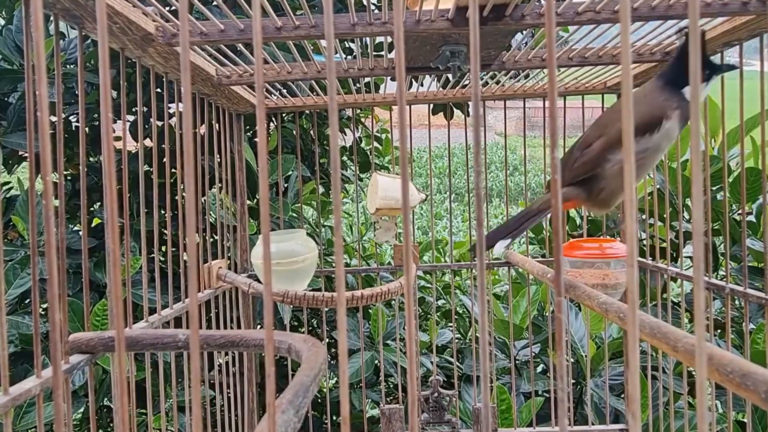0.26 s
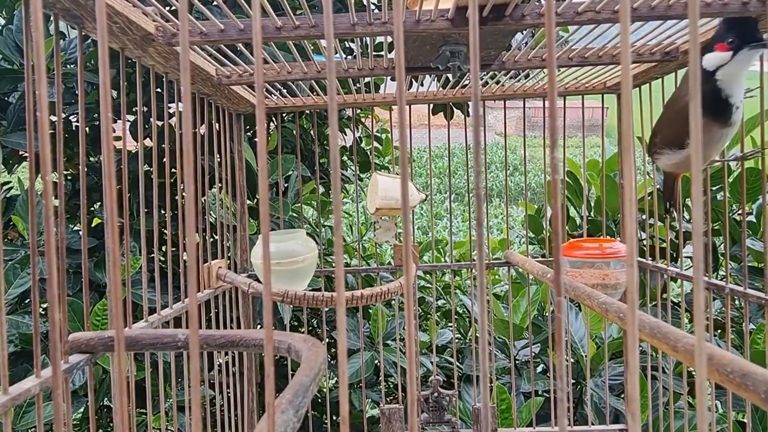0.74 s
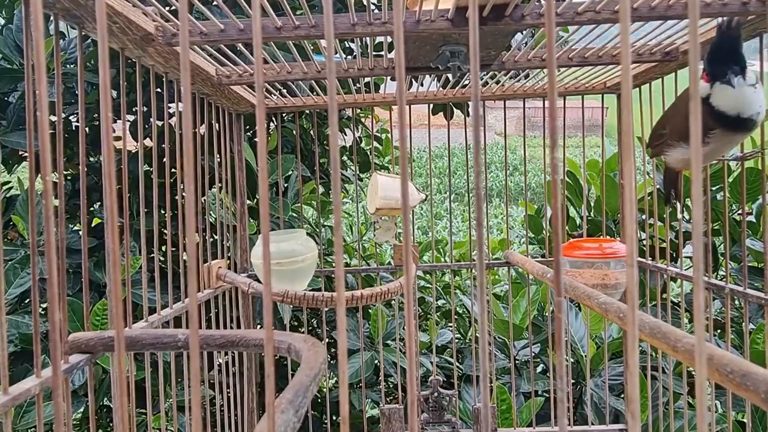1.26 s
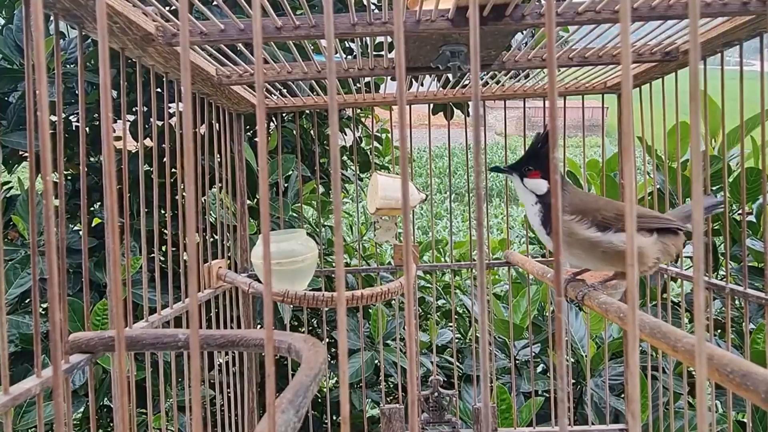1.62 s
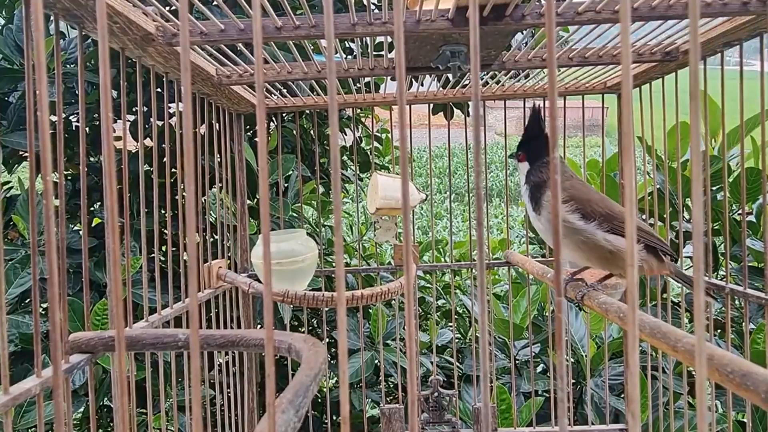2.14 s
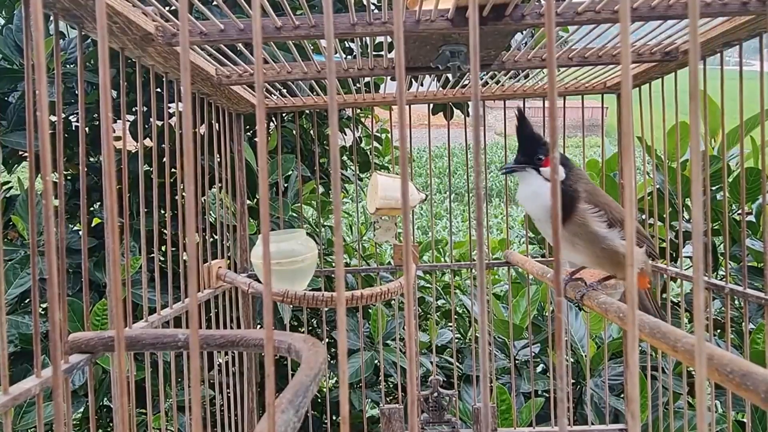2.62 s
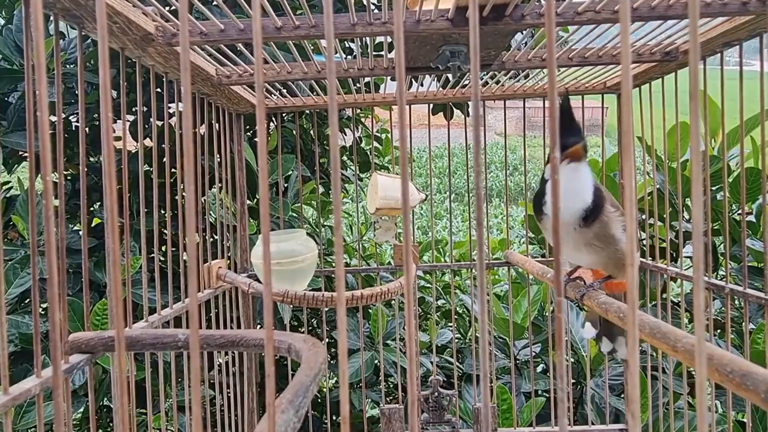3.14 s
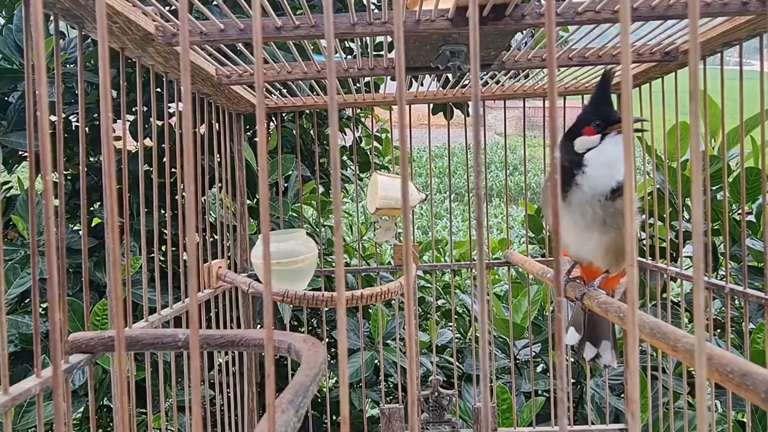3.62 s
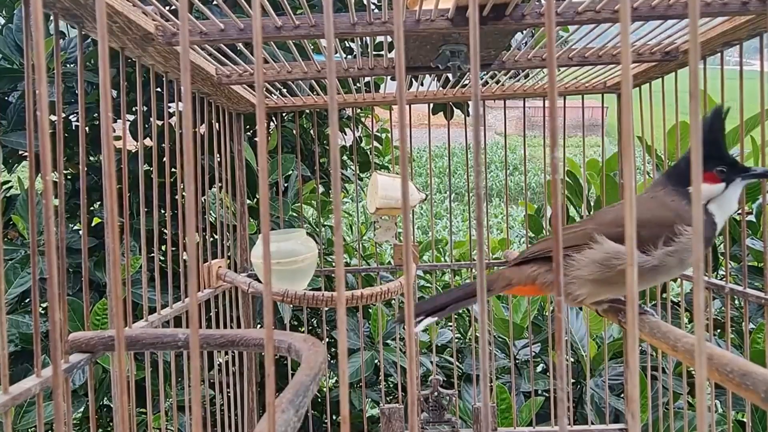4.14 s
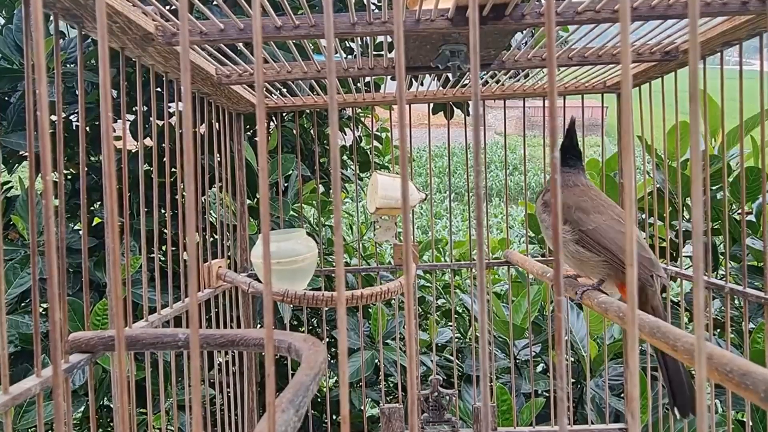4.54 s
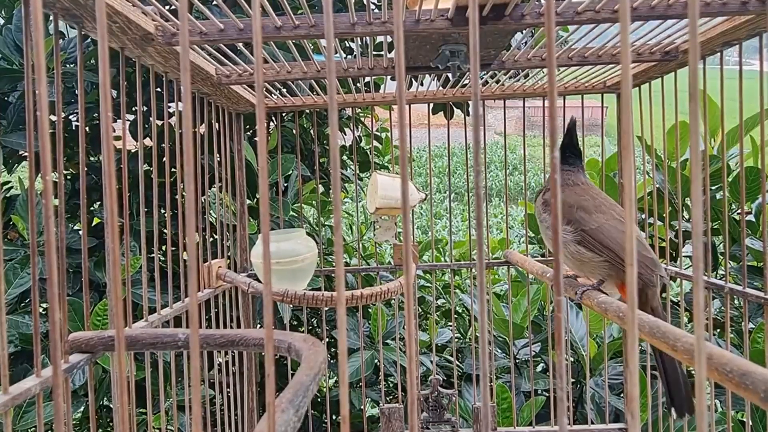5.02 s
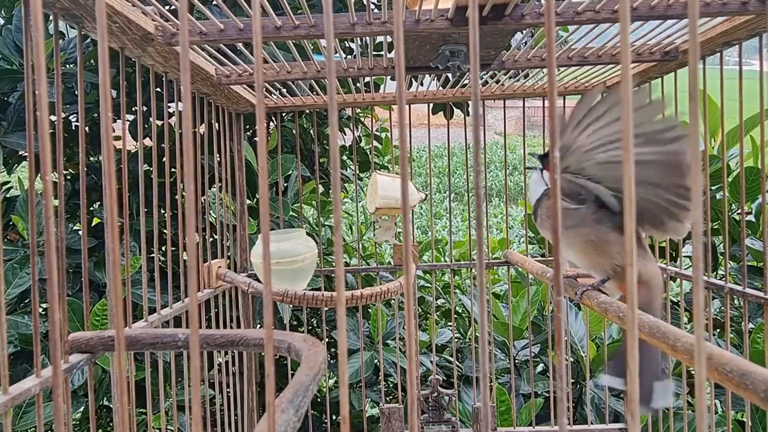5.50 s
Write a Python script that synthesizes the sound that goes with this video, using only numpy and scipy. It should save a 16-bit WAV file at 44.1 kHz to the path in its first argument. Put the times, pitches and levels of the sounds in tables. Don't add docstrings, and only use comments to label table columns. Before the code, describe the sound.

An outdoor yard, very quiet: low traffic rumble, thin leaf hiss and blurred far birds giving falling whistles from 0.3 to 1.2 s, then answering calls and dim coos until about 2.7 s. Small dry scratches of claws and wings on thin cage bars come near 0.45, 0.75 and 1.6 s. At 2.7 s the close bird suddenly whistles, far louder than everything else: a bouncing low-to-mid note, a harsh warble at 3.05, then from 3.2 to 3.9 a rapid run of rising, sweeping and rippling notes, ending on a soft flat low tone. Each is fluttery, slightly hoarse and airy, with a short cage echo. A faint rustle follows at 4.0, a distant metal knock at 4.45, then soft wing flutter and low wind puffs. A loud high warble sounds at 5.2, a climbing one at 5.55, and a brief soft chirp at 5.7.

```python
import sys
import numpy as np
from scipy import signal
from scipy.io import wavfile
from scipy.ndimage import uniform_filter1d, minimum_filter1d

SR = 44100
rng = np.random.default_rng(int(sys.argv[2]) if len(sys.argv) > 2 else 0)


def generate_wav(sig):
    pcm = np.round(np.clip(np.atleast_2d(sig).T, -1, 1) * 32767).astype(np.int16)
    wavfile.write(sys.argv[1], SR, pcm)


def voltage_ratio(decibels):
    exponent = np.asarray(decibels, float) / 20
    return 10 ** exponent


N = 254456


def rms_one(x):
    return x / np.sqrt(np.mean(x ** 2) + 1e-20)


def at_hz(points, hz):
    points = np.array(points)
    return np.interp(np.log(hz), np.log(points[:, 0]), points[:, 1])


def add(out, sound, start_s):
    i = round(start_s * SR)
    out[:, i:i + sound.shape[-1]] += sound[..., :N - i]


def drift(rate_hz, size):
    u = np.arange(size) * rate_hz * 2 / SR
    eased = u - np.sin(2 * np.pi * u) / (2 * np.pi)
    return np.interp(eased, np.arange(size), rng.standard_normal(size))


def band(x, low_hz, high_hz):
    return signal.sosfilt(signal.butter(2, [low_hz, high_hz], "band", fs=SR, output="sos"), x)


def coloured(points, alike, lead, patchy_db):
    out = 0
    white = rng.standard_normal((2, 2, N))
    for k, low_hz in enumerate(20 * 2 ** np.arange(0, 10, .5)):
        hz = low_hz * 2 ** .25
        mid, side = band(white[k % 2], low_hz, low_hz * 2 ** .5)
        c = np.clip(at_hz(alike, hz), 0, 1)
        left, right = np.sqrt(1 + c) * mid + np.sqrt(1 - c) * side * [[1], [-1]]
        lag = round(at_hz(lead, hz) / (2 * np.pi * hz) * SR)
        level = voltage_ratio(at_hz(points, hz) + patchy_db * drift(4, N))
        out = out + level * np.array([left, np.roll(right, lag)])
    return rms_one(out)


def echoes(x, t60_s, alike):
    t = np.arange(int(.9 * SR)) / SR
    mid, side = rng.standard_normal((2, len(t))) * voltage_ratio(-60 * t / t60_s) * (t > .001)
    answer = alike * mid + (1 - alike) * side * [[1], [-1]]
    answer /= np.sqrt(np.mean(np.sum(answer ** 2, axis=1)))
    return signal.fftconvolve(x, answer, axes=1)[:, :N]


# freq_hz, level_db
PARTIALS = [(5000, -52.5), (7500, -50), (9500, -41), (12500, -37), (15000, -41)]
ATTACK_S, RELEASE_S, EDGE_DB = .007, .0079, -35
MID_HZ, LEFT_DB_PER_KHZ, BRIGHT_DB_PER_KHZ = 2600, -3, 4
HALF_PITCH_DB, HALF_DB_PER_KHZ = -51, 7
JITTER_HZ, HOARSE = 25, .15
OVERTONE_FUZZ, OVERTONE_BLUR_RAD = .97, .8
BEAK_WIDTH_HZ, BEAK_LOSS_DB = 1500, -1.5


def note(rows, warble, turns, left_db, lead_us, bright_db, second_db, beak_hz, lift_db):
    first_hz, last_hz, swing_hz, depth = warble
    start_turns, ahead_turns = turns
    s, hz, level_db, effort = np.transpose(rows)
    t = np.arange(s[0] - ATTACK_S, s[-1] + RELEASE_S, 1 / SR)
    size = len(t)
    hz, level_db, effort = [np.interp(t, s, c) for c in (hz, level_db, np.clip(effort, 0, 1))]
    hz = uniform_filter1d(hz, size=90)
    high_khz = (hz - MID_HZ) / 1000
    bright_db = bright_db + BRIGHT_DB_PER_KHZ * high_khz
    second_db = second_db + 2 * BRIGHT_DB_PER_KHZ * high_khz

    rate_hz = np.linspace(first_hz, last_hz, size) * (1 + .03 * drift(60, size))
    shake = 2 * np.pi * (start_turns + np.cumsum(rate_hz) / SR)
    hz = hz + swing_hz * effort * np.sin(shake + 2 * np.pi * ahead_turns)
    hz = hz + (6 + JITTER_HZ * effort) * drift(300, size)
    throb = np.clip(depth, 0, 1) * effort
    throbbing = 1 - throb + throb * np.cos(shake) + HOARSE * throb * drift(220, size)
    throbbing /= np.sqrt((1 - throb) ** 2 + throb ** 2 / 2)

    edge = np.maximum(0, np.maximum((s[0] - t) / ATTACK_S, (t - s[-1]) / RELEASE_S))
    level = voltage_ratio(uniform_filter1d(level_db + EDGE_DB * edge, size=130))
    level = level * np.clip(np.minimum(t - t[0], t[-1] - t) / .002, 0, 1)

    ear_lead_s = lead_us * 1e-6 * np.array([[.5], [-.5]])
    phase = 2 * np.pi * (np.cumsum(hz) / SR + hz * ear_lead_s)
    tone = np.sin(phase)
    tone += voltage_ratio(second_db) * np.sin(2 * phase + OVERTONE_BLUR_RAD * effort * drift(250, size))
    tone += voltage_ratio(HALF_PITCH_DB + HALF_DB_PER_KHZ * high_khz) * np.sin(phase / 2)
    tone *= level * throbbing

    for k in range(3, 9):
        flicker = .8 * drift(400, size) + .6 * drift(350, size) * [[1], [-1]]
        fuzz = 1 + OVERTONE_FUZZ * (.5 + .5 * effort) * flicker
        beak_db = BEAK_LOSS_DB + lift_db * np.exp(-((k * hz - beak_hz) / BEAK_WIDTH_HZ) ** 2)
        gain = voltage_ratio(at_hz(PARTIALS, k * hz) + bright_db + beak_db) * (k * hz < .4 * SR)
        blur = OVERTONE_BLUR_RAD * (.12 + 1.3 * effort) * drift(900, size)
        tone += level ** .6 * gain * fuzz * np.sin(k * phase + blur)

    left_db = left_db + LEFT_DB_PER_KHZ * high_khz
    return tone * voltage_ratio(np.array([left_db / 2, -left_db / 2])), level ** .7 * voltage_ratio(bright_db)


CRACK_HALF_S, CRACK_EDGE_DB = .007, -10


def crack(mid_s, first_hz, last_hz, level_db):
    soft_db = level_db + CRACK_EDGE_DB
    return [(mid_s - CRACK_HALF_S, first_hz, soft_db, 1),
            (mid_s, (first_hz + last_hz) / 2, level_db, 1),
            (mid_s + CRACK_HALF_S, last_hz, soft_db, 1)]


# time_s, pitch_hz, level_db, effort_0to1
OPENING_NOTES = [
    [(2.735, 1553, -17.5, .03), (2.757, 1951, -7, 0), (2.768, 2300, -8, .07), (2.78, 2136, -5, 0),
     (2.786, 1899, -8, 0), (2.797, 2240, -15, .12), (2.808, 2290, -4, 0), (2.817, 2008, -13, .05),
     (2.83, 1200, -35, 0)],
    [(3.049, 2557, -8.5, 0.89), (3.056, 2269, -13.0, 0.8), (3.063, 3001, -6.0, 0.77),
     (3.069, 2613, -10.5, 0.14), (3.075, 3553, -2.5, 0.9), (3.083, 2624, -13.5, 0.83)],
    [(3.224, 1446, -29.5, 0.0), (3.233, 1960, -18.5, 0.23), (3.24, 2548, -5.0, 0.3),
     (3.248, 2513, -6.5, 1.0), (3.256, 3057, -6.5, 0.24), (3.265, 3048, -8.5, 0.78),
     (3.274, 3008, -3.0, 0.2)],
    [(3.285, 2503, -7.0, 1.0), (3.291, 2263, -17.0, 0.74), (3.3, 2269, -14.0, 1.0),
     (3.31, 2274, -11.0, 0.8), (3.32, 2469, -9.5, 1.0)],
]
RUN_NOTES = [
    [(3.386, 2164, -14.0, 0.4), (3.396, 2582, -15.5, 0.89), (3.402, 2867, -9.5, 0.0),
     (3.415, 2906, -7.0, 0.01), (3.43, 2836, -9.0, 0.0), (3.438, 2958, -12.5, 0.12)],
    [(3.497, 1484, -26.0, 0.0), (3.513, 1774, -23, 0.13), (3.52, 2350, -15, 1), (3.53, 2775, -8.5, 1),
     (3.537, 3016, -5, 0.85), (3.545, 3250, -11.0, 0.35), (3.562, 3620, -16, 0.97), (3.575, 3900, -23, 1.0),
     (3.588, 4200, -31, 0.76)],
    [(3.642, 1930, -30, .37), (3.648, 2280, -17, .71), (3.654, 3399, -24, .03), (3.662, 3162, -14, .33),
     (3.667, 3298, -12, .95), (3.678, 3209, -10, .4), (3.688, 3140, -13, .35), (3.702, 3150, -32, .5)],
    [(3.744, 2640, -14.0, 0.42), (3.76, 2742, -18.0, 0.81), (3.767, 2469, -9.0, 0.0),
     (3.784, 2318, -7.5, 0.11), (3.79, 2413, -10.5, 0.53), (3.803, 2514, -11.5, 0.64),
     (3.811, 2340, -9.5, 0.0), (3.82, 2209, -10.0, 0.0), (3.829, 2204, -10.0, 0.26)],
    [(3.837, 1745, -20, 0.0033), (3.887, 1750, -21.5, 0.0043)],
]
CLOSING_NOTES = [
    [(5.2, 1560, -28, .2), (5.206, 2070, -20, .4), (5.211, 3322, -2.01, 1), (5.225, 3415, -2.5, 1),
     (5.24, 3432, -4, .85), (5.258, 3581, -4.5, .8), (5.269, 3800, -7, .9), (5.281, 3950, -26, 1)],
    [(5.559, 1998, -22.0, 0.3), (5.57, 2363, -13.5, 0.97), (5.58, 2313, -10.5, 0.81),
     (5.597, 2594, -6.5, 0.67), (5.61, 2845, -6.5, 0.81), (5.62, 2945, -8.5, 0.8),
     (5.632, 2836, -8.0, 0.82), (5.643, 2986, -7.5, 0.06), (5.654, 2901, -10.5, 0.0)],
    [(5.709, 2177, -25.0, 0.86), (5.716, 1963, -30.5, 0.59), (5.722, 2370, -14.0, 0.39),
     (5.728, 2561, -12.5, 0.53), (5.733, 2234, -12.5, 0.06)],
]
# start_rate_hz, end_rate_hz, pitch_swing_hz, throb_0to1 (both at full effort)
WARBLES = [(92, 108, 550, .87), (95, 130, 135, .7), (126, 84, 417, .25), (105, 107, 17, 1),
           (95, 94, 589, .63), (100, 90, 380, 1), (71, 107, 312, .56), (108, 76, 290, .35), (95, 95, 5, .1),
           (184, 190, 150, 1), (95, 89, 241, .26), (75, 101, 374, .41)]
WARBLE_TURNS = [(.67, .27), (.96, .19), (.3, .44), (.24, .56), (.34, .21), (.9, .51), (.48, .77), (0, .72),
                (.1, 0), (.74, .37), (.56, .27), (.03, .37)]
# head_left_db, left_lead_us, brightness_db, second_partial_db
HEAD_POSES = [(0, 5, 4, -34), (0.5, 33, 0, -42.5), (1, 77, 3, -46.5), (2.5, 108, 2, -45.5),
              (2.5, 71, 1.5, -42), (3, 101, 0, -48), (3, 28, 0, -42), (4, 78, 1.5, -47), (3.5, 89, 1, -33),
              (1, 91, -6, -39), (1, 74, -2.5, -37), (1.5, 49, 0, -44)]
# centre_hz, lift_db
BEAK_LIFTS = [(12500, 4), (12000, 2), (14000, 4), (12000, 4), (14500, 10), (11000, 6), (9600, 9),
              (13800, 7), (12300, 6), (11000, 5), (9000, 8), (8000, 4)]
# share_0to1, delay_ms
ROOF_ECHOES = [(.1, 3.26), (.41, 1.717), (.55, 2.44), (.05, 2), (.62, 1.429), (.3, 2.415), (.4, 1.458),
               (.55, 2.46), (.05, 2), (.2, 2.21), (.68, 1.936), (.48, 2.396)]
# head_pose_index, mid_s, first_hz, last_hz, level_db
VOICE_CRACKS = [
    (1, 2.825, 3400, 2250, -10),
    (9, 5.205, 2600, 4000, -18),
    (2, 3.093, 1700, 900, -42),
    (1, 3.039, 1700, 2600, -46),
    (11, 5.714, 2900, 3000, -30),
]
CRACK_WARBLE = (190, 190, 200, .7)
# freq_hz, level_db_per_hz
BREATH_HISS = [(4000, -16.5), (6500, -20), (8500, -9.5), (11000, -5.5), (13500, -20.5), (16000, -8)]
SINGER_DB, BREATH_DB = 1, -41
CAGE_DB, CAGE_T60_S = -18, .04
WALLS_DB, WALLS_T60_S = -35, .62
HAZE_DB, HAZE_HZ = -38, 1100


def singer():
    out, air = np.zeros((2, N)), np.zeros((2, N))
    poses = [(*pose, *beak) for pose, beak in zip(HEAD_POSES, BEAK_LIFTS)]
    curves = [*OPENING_NOTES, *RUN_NOTES, *CLOSING_NOTES]
    voices = list(zip(curves, WARBLES, WARBLE_TURNS, poses, ROOF_ECHOES))
    for index, *glide in VOICE_CRACKS:
        voices.append((crack(*glide), CRACK_WARBLE, (0, .05), poses[round(index)], (0, 0)))
    for rows, warble, turns, pose, (share, delay_ms) in voices:
        tone, escaping = note(rows, warble, turns, *pose)
        start_s = rows[0][0] - ATTACK_S
        add(out, tone, start_s)
        add(out, share * tone, start_s + delay_ms / 1000)
        add(air, escaping, start_s)
    hiss = coloured([(2800, -70), *BREATH_HISS], [(100, .75), (200, .75)], [(100, 0), (200, 0)], patchy_db=3)
    out += voltage_ratio(BREATH_DB) * air * hiss
    cage = voltage_ratio(CAGE_DB) * echoes(out, CAGE_T60_S, alike=.69)
    walls = voltage_ratio(WALLS_DB) * echoes(out, WALLS_T60_S, alike=.24)
    return voltage_ratio(SINGER_DB) * (out + cage + walls) * (1 + voltage_ratio(HAZE_DB) * drift(HAZE_HZ, N))


# start_s, level_db, lasts_s, low_edge_hz
CAGE_SCUFFS = [
    (0.429, -56, .015, 150),
    (0.447, -50, .014, 2960),
    (0.506, -51, .018, 900),
    (0.757, -57.5, .014, 890),
    (1.561, -62.5, .018, 5000),
    (1.578, -47, .016, 2500),
    (1.639, -55.5, .045, 150),
    (3.989, -65, 0.054, 5980),
    (4.095, -63, 0.008, 300),
]
# freq_hz, width_hz, level_db
BAR_RINGS = [(300, 150, 8), (1096, 130, 11.5), (5300, 520, 0.5), (6700, 680, 2.5), (8970, 610, 3.5),
             (14350, 1700, -1.5)]


def scuffs():
    out = np.zeros((2, N))
    for start_s, level_db, lasts_s, low_hz in CAGE_SCUFFS:
        u = np.linspace(0, 1, int(lasts_s * SR * 2))
        mid, side = rng.standard_normal((2, 5000))[:, :len(u)]
        grain = (mid + .5 * side * np.array([[1], [-1]])) * voltage_ratio(1.3 * drift(255, len(u)))
        grain = grain * np.minimum(u * 12, 1) * (1 - u) ** 2
        brush = .4 * grain
        for hz, width_hz, db in BAR_RINGS:
            brush = brush + voltage_ratio(db) * signal.lfilter(*signal.iirpeak(hz, hz / width_hz, fs=SR), grain)
        highpass = signal.butter(2, low_hz, "high", fs=SR, output="sos")
        add(out, voltage_ratio(level_db) * signal.sosfilt(highpass, brush), start_s)
    return out


# start_s, first_hz, level_db
FALLING_WHISTLES = [
    (0.304, 3294, -56.5),
    (.48, 3260, -54),
    (.668, 3185, -53.5),
    (.859, 3070, -55.5),
    (1.09, 3020, -56),
]
# start_s, lasts_s, first_hz, last_hz, level_db
ANSWER_CALLS = [(1.19, .16, 2644, 2020, -57), (1.369, .166, 2630, 2150, -59.5), (.94, .05, 1740, 1900, -68),
                (1.363, .11, 1800, 1720, -69), (1.125, .13, 1875, 2290, -68), (1.6, .13, 3416, 3350, -60),
                (1.786, .085, 2500, 2750, -58), (1.894, .077, 3100, 3150, -52),
                (1.899, .066, 3650, 3115, -55), (1.95, .095, 2900, 2264, -50),
                (2.154, .17, 2720, 2150, -62), (2.03, .17, 2328, 2358, -62.5)]
# start_s, lasts_s, first_hz, last_hz, level_db
THIN_WHISTLES = [
    (.582, 0.19, 6230, 5290, -68),
    (.758, 0.2, 5270, 4900, -66.5),
    (.887, .19, 4950, 4680, -62.5),
    (1.05, .2, 4800, 4750, -78),
    (5.014, 0.21, 3650, 3900, -72),
    (5.348, 0.24, 3960, 4750, -67.5),
]
# start_s, lasts_s, pitch_hz, level_db
HOARSE_CHIRPS = [(0, .2, 2650, -72.5), (0, .2, 3250, -76.5), (1.238, .12, 4000, -76), (1.6, .09, 2850, -61),
                 (2.1, .1, 3150, -64), (2.625, .11, 3317, -53.5), (2.64, .09, 3780, -56.5),
                 (2.635, .09, 2950, -56.5), (4.73, .03, 3800, -70), (4.83, .08, 2600, -74),
                 (4.92, .04, 1230, -68)]
# start_s, lasts_s, pitch_hz, level_db
DOVE_COOS = [(1.323, 0.096, 647, -55.5), (1.643, 0.089, 591, -62), (1.784, 0.095, 606, -65.5),
             (2.595, .125, 636, -63), (4.018, 0.13, 607, -61), (4.294, .13, 506, -64.5),
             (.748, .445, 304.5, -68), (1.574, .126, 386.6, -61), (1.63, 0.22, 142.8, -55),
             (4.106, .19, 143.7, -66)]
FALL_S, FALL_END_HZ = .105, 2450
CHIRP_RISE, COO_SAG = 1.04, .95
FALL_HUSK, ANSWER_HUSK, THIN_HUSK, CHIRP_HUSK, COO_HUSK = .65, .7, .22, .9, .77
PEEP_FIRST_S, PEEP_EVERY_S, PEEP_LASTS_S = .012, .1862, .03
PEEP_LOW_HZ, PEEP_HIGH_HZ, PEEP_DB, PEEP_HUSK = 4900, 6700, -75.5, .2


def far_calls():
    calls = [(s, FALL_S, hz, FALL_END_HZ, db, FALL_HUSK) for s, hz, db in FALLING_WHISTLES]
    calls += [(*call, ANSWER_HUSK) for call in ANSWER_CALLS]
    calls += [(*call, THIN_HUSK) for call in THIN_WHISTLES]
    calls += [(s, lasts_s, hz, hz * CHIRP_RISE, db, CHIRP_HUSK) for s, lasts_s, hz, db in HOARSE_CHIRPS]
    calls += [(s, lasts_s, hz, hz * COO_SAG, db, COO_HUSK) for s, lasts_s, hz, db in DOVE_COOS]
    for s in PEEP_FIRST_S + PEEP_EVERY_S * np.arange(27):
        calls.append((s, PEEP_LASTS_S, PEEP_LOW_HZ, PEEP_HIGH_HZ, PEEP_DB, PEEP_HUSK))
    return calls


FAR_BEND, FAR_PEAK, FAR_SWELL = 1.35, .8, .8


def far_birds():
    out = np.zeros((1, N))
    for start_s, lasts_s, first_hz, last_hz, level_db, husk in far_calls():
        u = np.linspace(0, 1, int(lasts_s * SR))
        hz = first_hz + (last_hz - first_hz) * u ** FAR_BEND
        hz = hz * (1 + .04 * husk * drift(120, len(u)))
        swell = np.sin(np.pi * u ** FAR_PEAK) ** FAR_SWELL
        swell = swell * (1 + husk * drift(first_hz / 20, len(u)))
        add(out, voltage_ratio(level_db) * swell * np.sin(2 * np.pi * np.cumsum(hz) / SR), start_s)
    return out


# freq_hz, level_db, t60_s
KNOCK_MODES = [(850, -13, .08), (1100, -12, .05), (1250, -8, .4), (2350, -12, .2), (2500, -10, .2),
               (2700, -9, .2), (2900, 0, .5), (3100, -9, .2), (3300, -10, .22), (3550, -12, .15)]
KNOCK_S, KNOCK_DB, CRACK_DB, CRACK_T60_S = 4.446, -46, -5, .01106


def metal_knock():
    out = np.zeros((1, N))
    t = np.arange(SR) / SR
    struck = band(rng.standard_normal(SR), 800, 9000) * voltage_ratio(CRACK_DB - 60 * t / CRACK_T60_S)
    for hz, db, t60_s in KNOCK_MODES:
        struck += voltage_ratio(db - 60 * t / t60_s) * (.3 + drift(110, SR)) * np.sin(2 * np.pi * hz * t)
    add(out, voltage_ratio(KNOCK_DB) * struck, KNOCK_S)
    return out


FAR_LAG_S, FAR_T60_S, FAR_WET_DB = .0004, .6, .1


def far_yard():
    mono = (far_birds() + metal_knock())[0]
    out = np.array([mono, np.roll(mono, round(FAR_LAG_S * SR))])
    return out + voltage_ratio(FAR_WET_DB) * echoes(out, FAR_T60_S, alike=.23)


FLUTTER_S = (4.55, 5.05, 5.7)
FLUTTER_RATE_HZ, FLUTTER_HZ, FLUTTER_DB = 14, 290, -55.5


def flutter():
    t = np.arange(N) / SR
    beats = np.interp(t, FLUTTER_S, [0, 1, 0]) * np.cos(np.pi * FLUTTER_RATE_HZ * t) ** 6
    soft = rms_one(band(rng.standard_normal(N), FLUTTER_HZ / 2 ** .5, FLUTTER_HZ * 2 ** .5))
    return voltage_ratio(FLUTTER_DB) * beats * soft


# start_s, level_db
WIND_PUFFS = [
    (4.0, -52),
    (4.45, -55),
    (4.8, -58),
    (5.27, -51),
    (5.5, -54),
    (5.6, -50),
    (5.72, -54),
]


def gusts():
    t = np.arange(N) / SR
    wind = rms_one(band(np.array([[1, .5], [1, -.5]]) @ rng.standard_normal((2, N)), 25, 80))
    puffs = sum(voltage_ratio(db) * np.exp(-((t - s - .03) / .025) ** 2) for s, db in WIND_PUFFS)
    return puffs * wind


# freq_hz, level_db_per_hz
YARD_SPECTRUM = [(13, -37), (22, -22), (59, -1), (112, -7.5), (356, -7.5), (510, -23), (569, -4.5),
                 (618, -16.5),
                 (1070, -22.5), (1270, -22.5), (1620, -30.5), (2670, -23.5), (7190, -40), (8720, -40),
             (16000, -66)]
# freq_hz, left_right_likeness_0to1
YARD_LIKENESS = [(30, .45), (60, .7), (150, .9), (300, .75), (600, .6), (1500, .3), (5000, .2), (15000, .5)]
# freq_hz, left_lead_rad
YARD_LEFT_LEAD = [(30, 0), (150, .3), (300, 1.3), (600, 2.1), (1200, 3.1), (2500, 4.1), (6000, 0)]
YARD_DB = -60


def traffic_and_leaves():
    spectrum = YARD_SPECTRUM
    return voltage_ratio(YARD_DB) * coloured(spectrum, YARD_LIKENESS, YARD_LEFT_LEAD, patchy_db=2.25)


def scene():
    return singer() + scuffs() + far_yard() + flutter() + gusts() + traffic_and_leaves()


GATE_FROM_HZ, TOP_HZ = 4400, 15900
GATE_FLOOR_DB, GATE_UNDER_DB, GATE_LUCK_DB = -112, -47, 8


def gate(x):
    hz, _, z = signal.stft(x, SR, nperseg=1024)
    bins, frames = z.shape[1:]
    power = uniform_filter1d(np.mean(np.abs(z) ** 2, axis=0), size=8, axis=0)
    level_db = 10 * np.log10(power + 1e-20)
    chance = rng.standard_normal((bins // 8 + 1, frames // 3 + 1))
    luck = np.kron(chance, np.ones((8, 3)))[:bins, :frames]
    bar_db = np.maximum(GATE_FLOOR_DB, level_db.max(axis=0) + GATE_UNDER_DB)
    keep = np.clip((level_db + GATE_LUCK_DB * luck - bar_db) / 3, 0, 1)
    keep[hz < GATE_FROM_HZ] = 1
    keep[hz > TOP_HZ] = 0
    return signal.istft(z * keep, SR, nperseg=1024)[1][:, :N]


def band_limit(x):
    return signal.sosfilt(signal.butter(12, 16480, fs=SR, output="sos"), x)


DUCK_DB, DUCK_S = 1.5, .44


def record(dry):
    r = np.exp(-1 / (DUCK_S * SR))
    loud = signal.lfilter([1 - r], [1, -r], np.abs(dry).max(axis=0))
    ducked = dry * voltage_ratio(-DUCK_DB * np.tanh(loud / .03))
    room = np.minimum(1, .88 / (np.abs(ducked).max(axis=0) + 1e-9))
    limit = uniform_filter1d(minimum_filter1d(room, size=200), size=200)
    return band_limit(gate(ducked * limit))


dry = scene()
out = record(dry)
generate_wav(out)
```